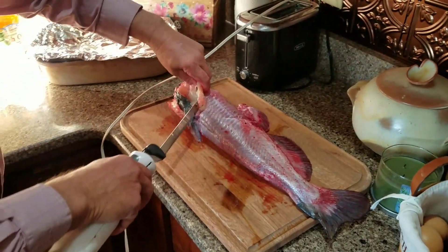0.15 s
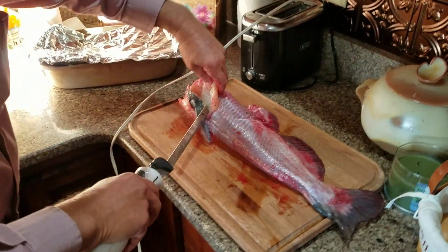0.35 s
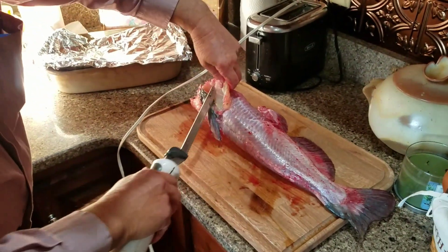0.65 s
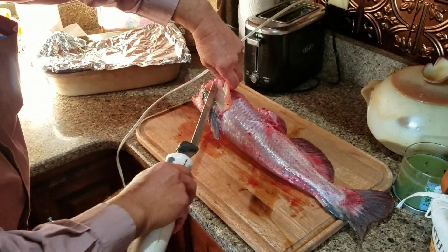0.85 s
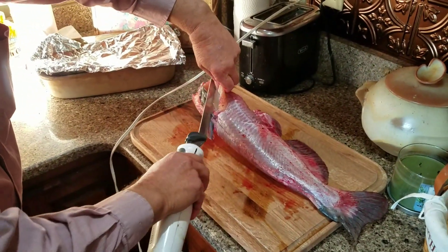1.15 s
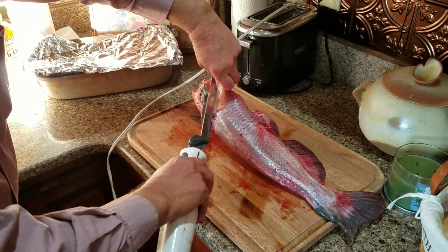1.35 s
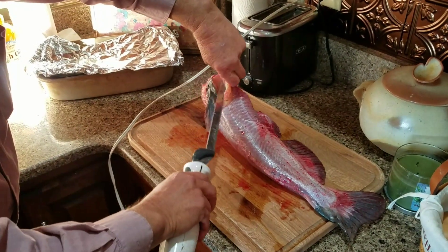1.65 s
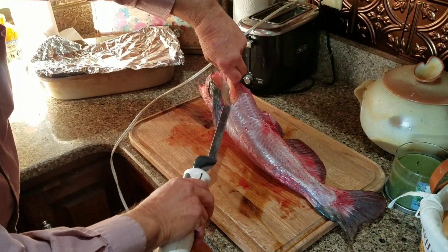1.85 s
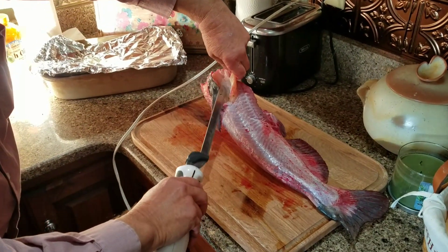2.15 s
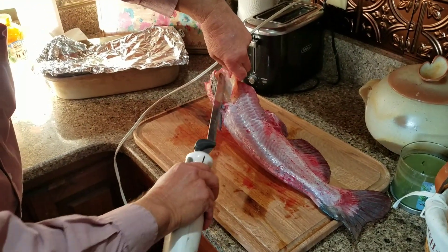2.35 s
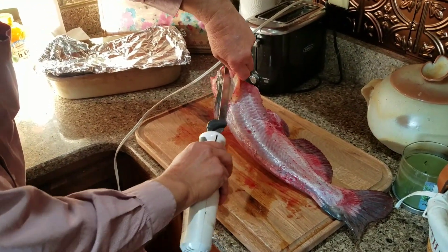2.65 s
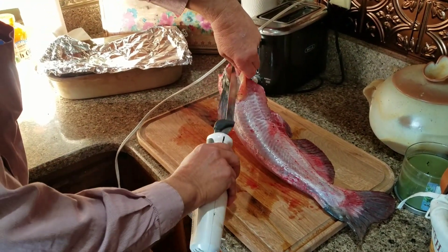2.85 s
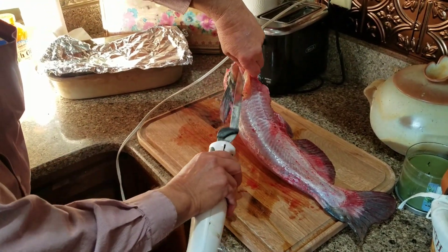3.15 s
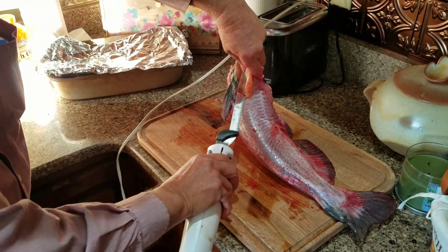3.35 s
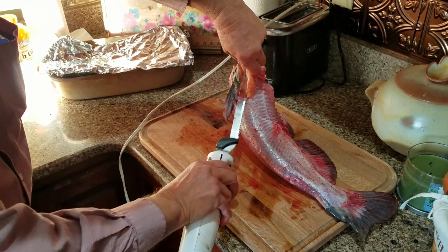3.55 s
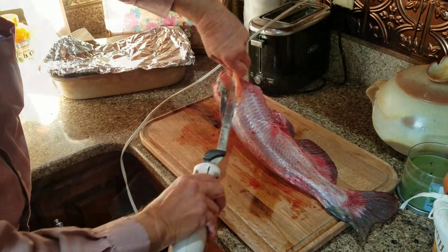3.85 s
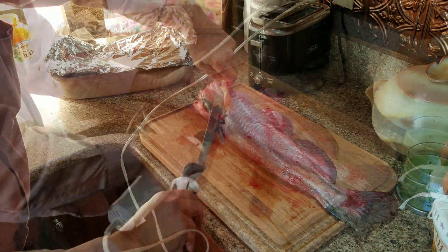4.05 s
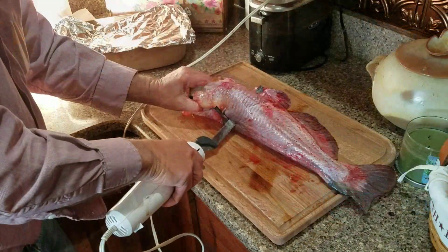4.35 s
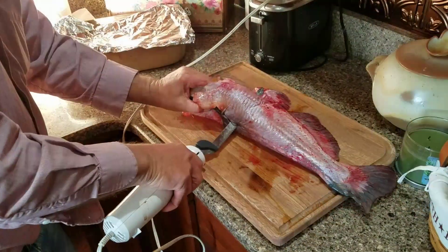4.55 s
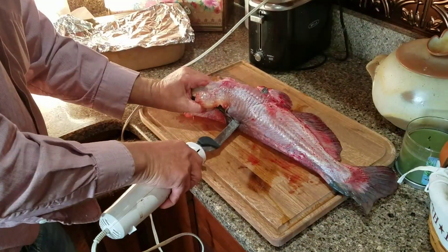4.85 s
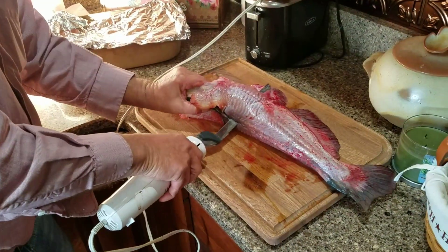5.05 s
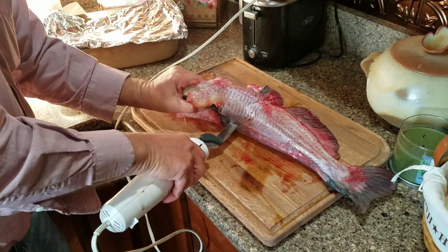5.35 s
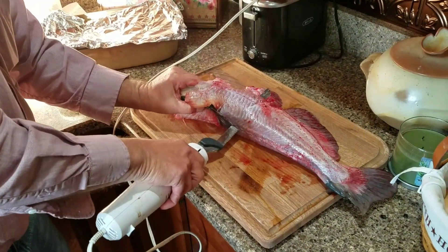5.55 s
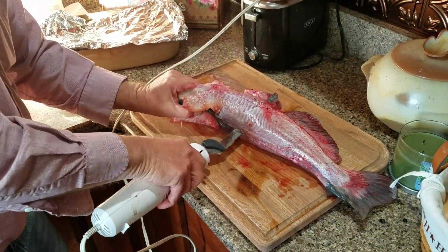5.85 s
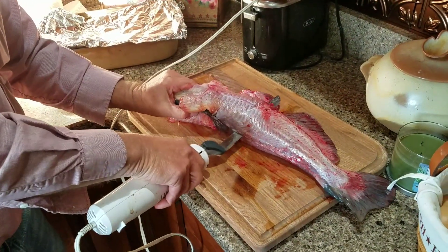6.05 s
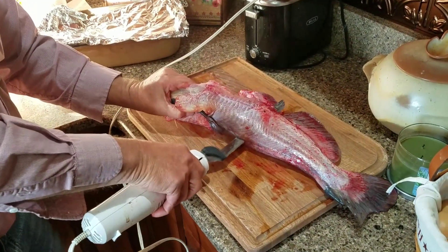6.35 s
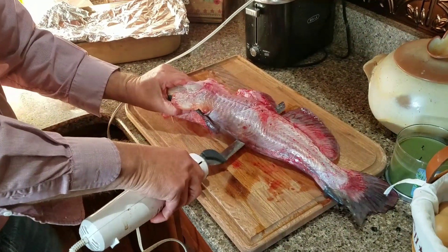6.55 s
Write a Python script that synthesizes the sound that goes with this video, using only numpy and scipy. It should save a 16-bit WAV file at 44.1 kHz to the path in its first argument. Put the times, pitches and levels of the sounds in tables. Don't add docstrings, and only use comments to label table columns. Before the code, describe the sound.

Close stereo pickup in a small hard-surfaced kitchen. After a faint drip, dull board knocks and light blade contacts, an electric knife motor whines and rattles in two short squeezes, then a longer one. The sound blends into another cut, nearer the left, where the buzzing blades labour and stutter for a moment before recovering and droning on to the end.

```python
import sys
import numpy as np
from scipy import signal
from scipy.fft import rfft, irfft, next_fast_len
from scipy.io import wavfile
from scipy.ndimage import uniform_filter1d

SR = 44100
rng = np.random.default_rng(int(sys.argv[2]) if len(sys.argv) > 2 else 0)


def volts_from_db(level):
    exponent = np.asarray(level, float) / 20
    return 10 ** exponent


def wav_record(signal):
    frames = np.transpose(np.atleast_2d(signal))
    bounded = np.clip(frames, -1, 1)
    quanta = np.round(bounded * 32767).astype(np.int16)
    wavfile.write(sys.argv[1], SR, quanta)


N = 295911

# start/s, end/s, rotor speed at the start/Hz
GRIPS = [
    (1.165, 2.54, 20),
    (2.535, 4.3, 40),
    (3.72, 6.71, 317.5),
]
# on/s, off/s, first f/Hz, last f/Hz, settling/s
PULLS = [
    [(1.168, 1.33, 341, 341, .031), (1.535, 1.805, 339, 341.5, .031)],
    [(2.54, 3.55, 341.3, 335.5, .031)],
    [(3.7, 4.445, 317.5, 309.5, .031), (4.445, 4.655, 258, 262, .05), (4.655, 6.25, 320.6, 317.3, .062),
     (6.25, 6.71, 317.3, 312.5, .031)],
]
ORDERS = [.4, .7, .8, .9, 1, 1.1, 1.2, 2, 3, 3.5, 3.9, 4.3, 4.4, 4.5, 5, 6, 7.1, .2, 1.8, 2.2, 3.1, 4]
WHINE = [
    [-30, -32, -30, -24, 0, -25, -30, -15, -8, -25, -40, -40, -40, -40, -40, -20, -40, -40, -40, -40, -40,
     -40],
    [-33, -19, -25, -20, 0, -21, -27, -14, -10, -19, -40, -40, -40, -40, -40, -10, -40, -40, -40, -40, -40,
     -40],
    [-35, -31, -28, -15.5, 0, -21, -24, -20, -12.5, -26, -40, -11, -10, -3, -15, -40, -14, -30, -28, -20,
     -19, -22],
]
# whine/dB, handle/dB, blade/dB, rumble/dB, handle drift/(dB per s)
FULL_SPEED = [(-36.5, -27, -29.5, -67.5, 0.04), (-33, -25, -26.5, -61, -0.5),
              (-32, -28.5, -26.5, -60.5, -0.33)]
# rotor f/Hz, whine/dB, handle/dB, blade/dB, rumble/dB
SLOWING = [(20, -55, -37.5, -34, -6.5), (137, -40, -17.5, -11.5, -4), (220, -25.5, -12, -8, -0.5),
           (276.3, -0.5, -6, -5, -9.5), (308.7, 0, -4.5, -1.5, -6.5), (312.6, 0.33, -2.5, 0.5, -8),
           (373, 0, -2, -0.8, 4.5)]
# t/s, whine change/dB
SLIPS = [(3.614, -4), (3.655, -5), (3.708, -6), (3.733, 10), (4.492, -7), (4.522, -9), (4.555, -4),
         (4.6, -18), (4.63, 9), (4.652, -5), (4.688, -3), (4.72, -3)]
STALL = 4.585, .075, -8, -2.5
# t/s, level/dB
PIN_PRESSURE = [(4.95, -20), (5.05, 0), (5.5, 0), (5.65, -8), (5.78, -3), (6.27, -3), (6.38, -20)]
CROSSFADE = 3.68, 4.554
# t/s, share/0-1
WEIGHT = [(4.4, 0.74), (4.7, 1), (5.1, 1), (5.4, 0.65), (6.3, 0.67), (6.71, 1)]
# handle throb/dB, blade throb/dB, blade slap/dB, repeating share of handle, of blades
CRANK = [(3.5, 5.5, -19, .1, .04), (3, 5, -20, .2, .1), (3, 5, -12, .14, .13)]
REVERSAL = [1.279, 2.951, 5.9143]
# t/s, rise of the rattle/dB
CLATTER = [(1.3687, 1.5), (1.4121, 0.5), (1.4595, -4), (1.5034, 4), (1.5478, 7), (1.9577, 5.5), (1.9996, 6),
           (2.048, 1), (2.0979, 3), (2.16, 3), (2.228, 2), (2.273, -3), (2.3114, 11), (2.3852, 5),
           (2.445, 6), (4.401, 1), (4.4128, 3), (4.4452, 4), (4.4831, -1), (4.5116, 6.5), (4.5445, 2.5),
           (4.5655, 5), (4.6109, 4.5), (4.6298, 6), (4.648, 4), (4.6677, 1), (4.6852, 1.5), (4.7021, 1)]
# f/Hz, level/(dB per Hz)
HANDLE = [
    [(240, -49), (400, -19), (528, -19), (690, -8), (867, -12), (948, -8), (1100, -13), (1500, -8),
     (1690, -10), (1970, -3), (2800, -16), (3640, -46), (6160, -120)],
    [(240, -46), (400, -16), (467, -30), (494, -18), (601, -17), (690, -8), (1010, -10), (1150, -14),
     (1410, -7), (1690, -9), (1890, -3), (2800, -17), (3640, -47), (6160, -120)],
    [(240, -46), (400, -16), (475, -22), (719, -9), (867, -15), (956, -9), (1180, -14), (1400, -4),
     (1680, -9), (2010, -4), (2440, -12), (2800, -12), (3640, -42), (6160, -120)],
]
# f/Hz, level/(dB per Hz)
BLADES = [
    [(1590, -48), (2700, -3.5), (4740, -7), (5670, -5), (8760, -14), (14200, -9), (16400, -12.5)],
    [(1590, -53), (2700, -7.5), (3780, -2.5), (4110, -4), (4960, -5), (6440, -6), (9950, -16.5),
     (14700, -10), (16400, -22)],
    [(1590, -19.5), (2700, -10.5), (3700, -5), (4020, -4), (4360, -4), (4960, -3.5), (7260, -7.5),
     (8570, -15), (12200, -12.5), (15100, -13.5), (16400, -18)],
]
# f/Hz, level/(dB per Hz)
RUMBLE = [
    [(12, -53), (20, -23), (27, -30), (87, -24), (130, -15), (220, -10.5), (290, -2.5), (480, -120)],
    [(12, -51), (20, -21), (27, -41), (65, 8.5), (92, 7), (135, -4), (220, 5.5), (290, -48), (480, -120)],
]
# f/Hz, level/dB
SLAP = [(5000, -38), (9000, -22), (12000, 4), (14000, 27), (15900, 30), (16300, -30), (17000, -66)]
# first f/Hz, last f/Hz, width/Hz, first level/dB, last level/dB, left minus right/dB
RINGS = [
    [(1970, 2020, 400, 3, -7.5, -3), (760, 758, 50, -21, -16.5, -5), (955, 1040, 32, -15, -36, -13),
     (1400, 1490, 200, -13, -13, -8), (327, 347, 130, -23, -16.5, -3), (14400, 14000, 2000, -18, -6, 2)],
    [(773, 740, 91, -16, -27, -2), (997, 1010, 84, -17, -31.5, 11), (1874, 1930, 220, -25, -11, 3),
     (1460, 1415, 220, -13, -14.5, -5.5), (5400, 5220, 500, -22, -18, 15), (4080, 4200, 500, -17, -17, 12),
     (3350, 3340, 150, -24, -24, 8)],
    [(1480, 1370, 100, -21, -37, 14), (747, 735, 43, -33, -19, 3), (5120, 4990, 360, -10, -16, 15.5),
     (4750, 4680, 500, -24, -12, 15), (4120, 4050, 380, -18, -11.5, 9.5),
     (11200, 11200, 1100, -38, -29, -11), (15700, 14500, 2300, -22, -7.5, 9.5),
     (2000, 2100, 260, -14, -14, 6), (2284, 2250, 51, -27, -15, -3), (1612, 1590, 76, -21, -23, -20),
     (3225, 3200, 380, -17.5, -13, -1), (324, 270, 115, -11.5, -21, 4)],
]
# t/s, level/dB
SLACK_HAND = [(2.62, -3), (2.67, 7.5), (2.83, 7.5), (2.92, 1), (4.8, 3.5), (4.98, 3.5), (5.1, -1),
              (5.19, 7.5), (5.3, 2.5), (5.55, 1), (5.65, 8), (5.78, -2)]
# t/s, level/dB
BURIED = [(2.55, -17), (2.75, -5), (2.9, 4), (3.15, -2.5), (3.7, 0), (4.3, -1.5), (5.5, -0.5), (5.65, -5),
          (6.2, -3), (6.33, 0.5), (6.71, -4)]
# f/Hz, level/dB
LEAN = [
    [(60, 1.5), (110, 2.4), (200, 2.7), (380, 4.9), (700, 1.7), (1290, 8), (2380, 0.91), (4400, 17),
     (8120, 3.2), (15000, 2)],
    [(60, 10), (110, 2.9), (200, 1.6), (380, 7), (700, 3.2), (1290, 18.6), (2380, 1.6), (4400, 41.5),
     (8120, 2.4), (15000, 11.6)],
]
# f/Hz, share/0-1
SAME = [
    [(60, 0.64), (150, 0.89), (380, 0.49), (950, 0.83), (2380, 0.28), (5980, 0.05), (15000, 0.046)],
    [(60, 0.5), (150, 0.74), (380, 0.88), (950, 0.5), (2380, 0.17), (5980, 0.11), (15000, 0.19)],
]
# f/Hz, phase/radians
LEAD = [
    [(60, 0), (16000, 0)],
    [(0, 0), (2150, 1.1), (3450, -4.7), (4740, -4.2), (6370, -13.3), (10100, -15.9), (11000, -14.1),
     (16600, -12.5)],
]
# start/s, length/s, peak level/dB
SLIDES = [(0.47, 0.13, -58), (0.588, 0.16, -46), (0.77, 0.3, -63.5), (0.97, 0.39, -64), (0.89, 0.28, -66),
          (0.005, 0.13, -65)]
# f/Hz, level/(dB per Hz)
SLIDE_COLOUR = [(180, -40), (300, -8), (455, -2.5), (749, -10), (1030, -5), (1660, -5), (2400, -9),
                (2610, -7.5), (6000, -14), (16000, -31)]
# t/s, peak level/dB, time to fade 60 dB/s, brightness/0-1
TICKS = [(0.698, -35, 0.014, 0), (0.202, -52, 0.02, 0.2), (0.335, -50, 0.02, 0.5),
         (0.7567, -50, 0.015, 0.3), (1.082, -42, 0.03, 0.7), (0.7945, -44, 0.016, 0.6),
         (0.8181, -24, 0.0056, 0.03), (0.8804, -42, 0.012, 0.9), (0.919, -31.5, 0.03, 0.15),
         (1.169, -27, 0.025, 0), (1.1922, -16, 0.021, 0.5), (1.225, -20, 0.014, 0.6),
         (1.46, -11.5, 0.018, 0.14), (1.5479, -16, 0.017, 0.4), (1.259, -15, 0.025, 0.7),
         (1.4118, -24, 0.02, 0.5), (1.583, -23, 0.023, 0.5), (1.612, -16, 0.02, 0.5),
         (2.093, -35, 0.016, 0.2), (2.1187, -19, 0.02, 0.6), (2.1785, -27, 0.018, 0.9),
         (2.2125, -19, 0.027, 0.34), (2.313, -34, 0.03, 0.2), (2.332, -20, 0.02, 0.3),
         (2.297, -42, 0.03, 0.8), (2.386, -29, 0.022, 0), (2.4958, -28, 0.02, 0.24)]
# t/s, peak level/dB, ring f/Hz, time to fade 60 dB/s
CLICKS = [(1.169, -37.5, 775, 0.05), (2.545, -28, 760, 0.055), (0.8181, -35.5, 1760, 0.0064),
          (1.1925, -26.5, 1990, 0.04), (1.2254, -32, 2000, 0.03), (1.547, -25, 2030, 0.024),
          (2.384, -43, 1410, 0.033)]
# t/s, peak level/dB, ring f/Hz, time to fade 60 dB/s
KNOCKS = [(0.462, -38, 300, 0.018), (0.478, -37, 291, 0.018), (0.489, -40, 312, 0.018),
          (0.498, -38, 226, 0.027), (0.514, -44, 336, 0.023), (0.526, -39, 231, 0.018),
          (0.547, -42, 183, 0.022), (0.565, -47, 250, 0.02), (0.587, -45, 240, 0.02),
          (0.449, -49, 1400, 0.02), (0.463, -43, 800, 0.015)]
# t/s, peak level/dB, ring f/Hz, time to fade 60 dB/s
DRIP = [(0.0672, -50, 1580, 0.026)]
# f/Hz, level/dB (rms)
HUM = [(118.4, -88), (215.3, -74), (355.3, -70), (414.5, -79), (786.0, -75)]
# f/Hz, level/(dB per Hz)
TRAFFIC = [(30, -20), (60, -13), (120, -3), (230, -3), (330, -20), (600, -60)]
# f/Hz, level/(dB per Hz)
ROOM_TONE = [(12, -37), (20, -18), (27, -9), (58, -12), (86, -32), (102, -6), (124, -14), (223, -32),
             (279, -19), (358, -6.5), (461, -15.5), (1650, -18.5), (2050, -14.5), (2600, -22.5),
             (9510, -37), (14900, -31), (16400, -26.5)]


def knife(start, end, start_hz, grip):
    t = np.arange(start, end, 1 / SR)
    rotor_hz = rotor(t, PULLS[grip], start_hz)
    whine_db, handle_db, blade_db, rumble_db = levels(t, rotor_hz, grip)
    slow = np.clip((295 - rotor_hz) / 80, 0, 1)
    turns = np.cumsum(rotor_hz) / SR
    crank = (turns - np.interp(REVERSAL[grip], t, turns)) / 10
    cut = grip // 2
    space = LEAN[cut], SAME[cut], LEAD[cut]

    out = np.sqrt(2) * volts_from_db(whine_db) * whine(t, rotor_hz, turns, grip) * volts_from_db([[1.4], [-1.6]])
    rumble = rng.standard_normal((2, len(t)))
    out += coloured(volts_from_db(rumble_db) * rumble, RUMBLE[cut], *space)

    handle_throb_db, blade_throb_db, slap_db, *repeat = CRANK[grip]
    mesh, teeth = gear_roughness(t, crank, slow, repeat)
    reversal = blade_reversals(crank, rotor_hz, slow)
    chatter = volts_from_db(chatter_level(t, slow, grip))
    drive = evened(volts_from_db(handle_throb_db * reversal) * chatter * mesh[0])
    out += coloured(drive * volts_from_db(handle_db), HANDLE[grip], *space)
    hiss = evened(volts_from_db(blade_throb_db * reversal) * chatter * mesh[1])
    out += coloured(hiss * volts_from_db(blade_db), BLADES[grip], *space)
    out += sliding_rings(t, drive, hiss, handle_db, blade_db, grip)

    slap_level_db = slap_db + blade_db + follow(t, PIN_PRESSURE[:2]) / 4
    slap = blade_slap(crank, rotor_hz, teeth[1]) * volts_from_db(slap_level_db)
    out += coloured(slap, SLAP, [(8000, 5.4), (16000, 18)], *space[1:])
    return start, out * signal.windows.tukey(len(t), 1 / 1000)


def rotor(t, pulls, start_hz):
    settle_shape = .8
    coast_s, drag_hz = .9, 200
    hz = np.full(len(t), float(start_hz))
    for on, off, first_hz, last_hz, settle_s in pulls:
        since = np.maximum(t - on, 0)
        goal = np.interp(t, [on, off], [first_hz, last_hz])
        miss = np.interp(on, t, hz) - first_hz
        driven = goal + miss * np.exp(-(since / settle_s) ** settle_shape)
        coast = (np.interp(off, t, driven) + drag_hz) * np.exp(-(t - off) / coast_s) - drag_hz
        hz = np.where(t < on, hz, np.where(t < off, driven, coast))
    return np.maximum(hz, 20)


def levels(t, rotor_hz, grip):
    slack_s = .003
    weight_rumble_db, weight_handle_db = 17, 2.5
    speed, *losses = np.transpose(SLOWING)
    *full, drift_db = FULL_SPEED[grip]
    fade_start, fade_end = CROSSFADE
    fade = np.clip((t - fade_start) / (fade_end - fade_start), 1e-3, 1 - 1e-3)
    fade_db = 20 * np.log10(fade if grip == 2 else 1 - fade)
    geared_hz = np.minimum(rotor_hz, np.interp(t - slack_s, t, rotor_hz))
    whine_db, handle_db, blade_db, rumble_db = (
        db + np.interp(geared_hz, speed, loss) + fade_db for db, loss in zip(full, losses))

    stall_s, stall_width_s, stall_whine_db, stall_rattle_db = STALL
    bind = np.exp(-((t - stall_s) / stall_width_s) ** 2)
    whine_db = whine_db + stall_whine_db * bind
    for s, db in SLIPS:
        whine_db = whine_db + db * np.exp(-((t - s) / .01) ** 2)
    weight = follow(t, WEIGHT)
    handle_db = handle_db + stall_rattle_db * bind + drift_db * (t - t[0]) + weight_handle_db * weight
    blade_db = blade_db + stall_rattle_db * bind
    return whine_db, handle_db, blade_db, rumble_db + weight_rumble_db * weight


def whine(t, rotor_hz, turns, grip):
    flutter_db = 1.8
    late_s, late_db = 6.3, 8
    slow = np.clip((295 - rotor_hz) / 80, 0, 1)
    total = np.zeros(len(t))
    for order, db in zip(ORDERS, WHINE[grip]):
        if db <= -40:
            continue
        level_db = db - (order > 1.5) * 250 * slow
        if order != 1:
            level_db = level_db + flutter_db * wander(len(t), 13)
        if order == 4.5:
            level_db = level_db + follow(t, PIN_PRESSURE)
        if order in (4.3, 4.4):
            level_db = level_db + np.interp(t, [5.0, 5.7], [-9, 0])
        if order == 2:
            level_db = level_db + np.interp(t, [late_s - .1, late_s + .12], [0, late_db])
        total += volts_from_db(level_db) * np.sin(2 * np.pi * (order * turns + rng.random()))
    shaking = np.clip((295 - rotor_hz) / 40, 0, 1)
    return total * volts_from_db(shaking * (3.5 * wander(len(t), 45) - 2))


def gear_roughness(t, crank, slow, repeat):
    wear = 2 * np.pi * .25 * t
    place = (crank % 1 * 1024).astype(int)
    first, second = rng.standard_normal((2, 2, 2, 1024))[..., place]
    teeth = first * np.cos(wear) + second * np.sin(wear)
    share = np.reshape(repeat, (2, 1, 1)) * (1 - slow)
    fresh = rng.standard_normal((2, 2, len(t)))
    return np.sqrt(1 - share) * fresh + np.sqrt(share) * teeth, teeth


def blade_reversals(crank, rotor_hz, slow):
    stroke = np.round(2 * crank)
    force = rng.uniform(.6, 1.3, 999)[stroke.astype(int) % 999] * (1 - .3 * (stroke % 2))
    away_s = (crank - stroke / 2) * 10 / rotor_hz
    return (1 - .85 * slow) * force * np.exp(-(away_s / .0022) ** 2)


def chatter_level(t, slow, grip):
    quick = evened(uniform_filter1d(rng.standard_normal(len(t)), 90))
    level_db = (1.2 + 1.3 * slow) * quick + clatter(t)
    if grip == 0:
        level_db += 1.2 * slow * wander(len(t), 30)
    return level_db


def clatter(t):
    rise_s, fall_s = 0.0017, 0.0045
    coarse = t[::16]
    stroke_s, rise_db = np.transpose(CLATTER)
    since = coarse - stroke_s[:, None]
    shape = np.exp(np.where(since < 0, since / rise_s, -since / fall_s))
    return np.interp(t, coarse, rise_db @ shape)


def sliding_rings(t, drive, hiss, handle_db, blade_db, grip):
    out = np.zeros((2, len(t)))
    load = np.interp(t, [t[0], PULLS[grip][-1][1]], [0, 1]) ** 2.5
    for first_hz, last_hz, width_hz, first_db, last_db, lean_db in RINGS[grip]:
        hz = (first_hz + (last_hz - first_hz) * load) * (1 + 0.006 * wander(len(t), 5.23))
        if first_hz < 2800:
            source, level_db, grasp = drive + 1.5 * drive[0], handle_db, SLACK_HAND
        else:
            source, level_db, grasp = hiss, blade_db, BURIED
        patchy_db = 2.2 * wander(len(t), 6)
        swell_db = patchy_db + first_db + (last_db - first_db) * load ** 0.15 + level_db
        swell_db += follow(t, grasp) * (1.8 if 600 < first_hz < 1100 else 1)
        sound = evened(ring(ring(source, hz, width_hz), hz, width_hz))
        out += sound * volts_from_db(swell_db + lean_db * np.array([[.5], [-.5]]))
    return out


def blade_slap(crank, rotor_hz, teeth):
    since_s = (crank % 1) * 10 / rotor_hz
    noise = rng.standard_normal((2, len(crank)))
    return evened(np.exp(-since_s / .0013) * (.6 * noise + .8 * teeth))


def slide(s, length, db):
    t = np.arange(0, length, 1 / SR)
    bite = np.minimum(t / 0.0066, 1)
    shape = bite * volts_from_db(db - 56 * (t / length - 0.33) ** 2)
    noise = rng.standard_normal((2, len(t)))
    return s, coloured(noise * shape, SLIDE_COLOUR, [(300, 11.0), (3000, 38), (12000, 43)], SAME[0])


def tick(s, db, t60, bright):
    t = np.arange(round(.08 * SR)) / SR
    noise = rng.standard_normal(len(t)) + 1.26 * rng.standard_normal((2, len(t)))
    noise += 5.6 * (t == 0)
    bright = np.clip(bright, 0, 1)
    puff = signal.lfilter([1, -bright], [1, -.6 * (1 - bright)], noise)
    band = signal.butter(2, [400, 8500], "bandpass", fs=SR, output="sos")
    puff = signal.sosfilt(band, puff)
    return s, 0.16 * volts_from_db(db - 60 * t / t60) * puff * volts_from_db([[3], [-4]])


def knock(s, db, hz, t60):
    t = np.arange(round(.08 * SR)) / SR
    return s, volts_from_db(db - 60 * t / t60) * np.sin(2 * np.pi * hz * t) * volts_from_db([[2], [-2]])


def kitchen(x, t60=0.046):
    t = np.arange(round(.4 * SR)) / SR
    tail = rng.standard_normal((2, len(t))) * volts_from_db(-60 * t / t60) * (t > .004)
    return signal.oaconvolve(x, tail / np.linalg.norm(tail[0]), axes=1)[:, :N]


def refrigerator(t):
    return sum(volts_from_db(db + 1 + 2.0 * wander(N, 0.6)) * np.sin(2 * np.pi * hz * t) for hz, db in HUM)


def traffic(t):
    noise = rng.standard_normal((2, N)) * volts_from_db(-60 - 14 * t)
    return coloured(noise, TRAFFIC, LEAN[0], SAME[1])


def room_tone():
    noise = rng.standard_normal((2, N)) * volts_from_db(0.5 * wander(N, 11.5))
    lean = [(60, 5.9), (1000, 2.8), (8000, 8.7)]
    same = [(60, 0.86), (1000, 0.15), (8000, 0.12)]
    return volts_from_db(-60) * coloured(noise, ROOM_TONE, lean, same)


def coloured(pair, colour, lean, same, lead=LEAD[0]):
    size = next_fast_len(pair.shape[1] + 2048)
    hz = np.fft.rfftfreq(size, 1 / SR)
    a, b = rfft(pair, size)
    gain = volts_from_db(read(colour, hz))
    gain /= np.sqrt(np.mean(gain ** 2))
    like = np.clip(read(same, hz), -1, 1)
    tilt = volts_from_db(read(lean, hz) / 2)
    turned = a * np.exp(-1j * np.interp(hz, *np.transpose(lead)))
    right = like * turned + np.sqrt(1 - like ** 2) * b
    sides = np.array([a * tilt, right / tilt])
    return irfft(sides * gain * 2 / (tilt + 1 / tilt), size)[:, :pair.shape[1]]


def ring(x, hz, width_hz):
    turn = np.exp(2j * np.pi * np.cumsum(hz) / SR)
    r = np.exp(-np.pi * width_hz / SR)
    return (turn * signal.lfilter([1 - r], [1, -r], x / turn)).real


def wander(size, hz):
    points = rng.standard_normal(99)
    return np.interp(np.arange(size) * hz / SR, np.arange(99), points, period=99)


def evened(x):
    return x / np.sqrt(np.mean(x ** 2) + 1e-20)


def follow(t, points):
    return np.interp(t, *np.transpose(points))


def read(points, hz):
    f, value = np.transpose(points)
    return np.interp(np.log(hz + 1), np.log(f + 1), value)


def add(mix, s, sound):
    part = mix[:, round(s * SR):][:, :sound.shape[1]]
    part += sound[:, :part.shape[1]]


def scene():
    mix, contacts = np.zeros((2, 2, N))
    for grip, row in enumerate(GRIPS):
        add(mix, *knife(*row, grip))
    for row in SLIDES:
        add(mix, *slide(*row))
    for row in TICKS:
        add(contacts, *tick(*row))
    for row in CLICKS + KNOCKS + DRIP:
        add(contacts, *knock(*row))
    mix += contacts + volts_from_db(-6) * kitchen(contacts)
    t = np.arange(N) / SR
    return mix + refrigerator(t) + traffic(t) + room_tone()


def top_cut(x):
    return signal.sosfilt(signal.butter(12, 17080, fs=SR, output="sos"), x)


def record(dry):
    band = signal.sosfilt(signal.butter(2, 45, "highpass", fs=SR, output="sos"), dry)
    edge = signal.firwin(1001, 15880, window=("kaiser", 8), fs=SR)
    mix = signal.oaconvolve(band, edge[None], "same")
    return top_cut(mix)


dry = scene()
out = record(dry)
wav_record(out)
```